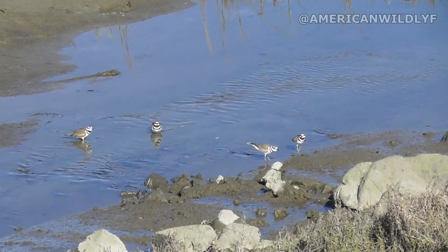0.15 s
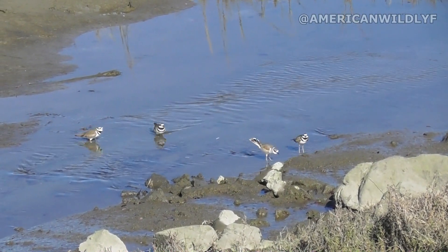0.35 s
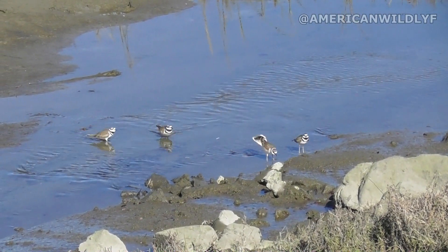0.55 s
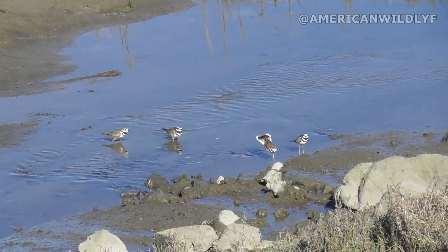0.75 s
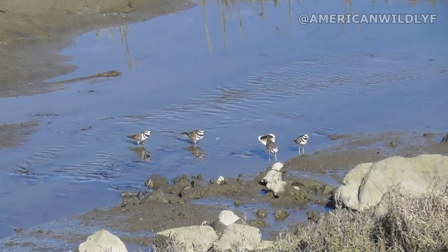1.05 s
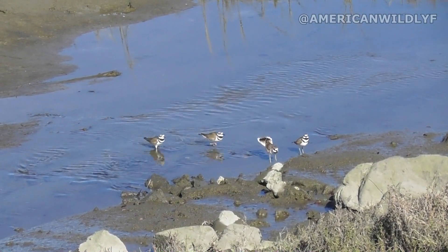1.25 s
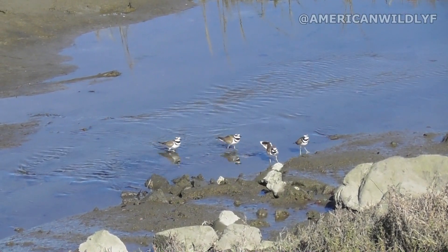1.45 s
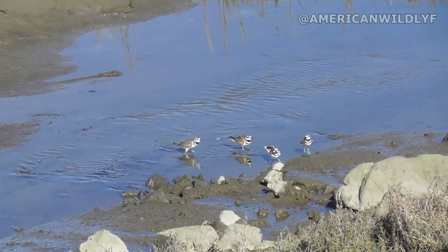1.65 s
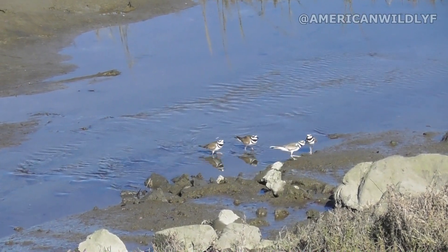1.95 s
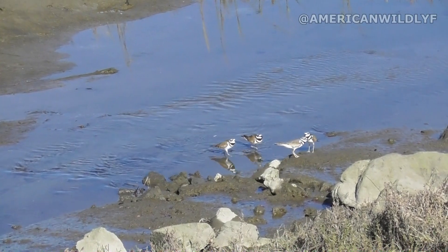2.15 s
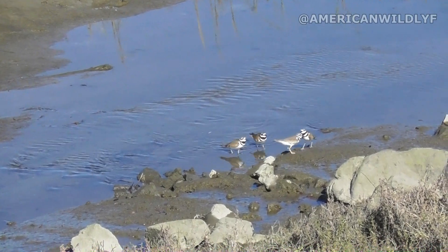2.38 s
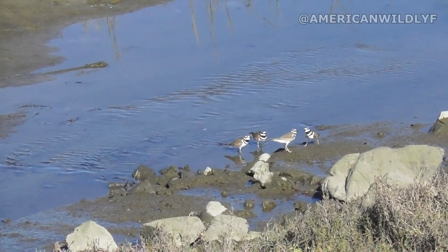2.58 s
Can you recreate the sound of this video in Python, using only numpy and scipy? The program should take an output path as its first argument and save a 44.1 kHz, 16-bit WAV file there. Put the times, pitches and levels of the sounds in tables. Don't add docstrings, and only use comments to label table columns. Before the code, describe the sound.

Small shorebirds pipe rapid, high, thin whistles and sharp kips over gusty wind and low rumble

```python
import sys
import numpy as np
from scipy import signal
from scipy.fft import rfft, irfft, next_fast_len
from scipy.io import wavfile
from scipy.ndimage import uniform_filter1d

SR = 44100
rng = np.random.default_rng(int(sys.argv[2]) if len(sys.argv) > 2 else 0)


def ratio_of_db(decibels):
    return 10 ** (np.asarray(decibels, float) / 20)


def to_wav(s):
    ch = np.atleast_2d(s).T
    pcm = np.round(np.clip(ch, -1, 1) * 32767)
    wavfile.write(sys.argv[1], SR, pcm.astype(np.int16))


N = 119952
BREEZE_DB = -51


def rms_one(x):
    return x / np.sqrt(np.mean(x ** 2) + 1e-20)


def filtered(x, order, hz, kind):
    return signal.sosfilt(signal.butter(order, hz, kind, fs=SR, output="sos"), x)


def drift(rate_hz):
    r = np.exp(-80 * np.pi * rate_hz / SR)
    slow = signal.lfilter([1], [1, -2 * r, r * r], rng.standard_normal(N // 40 + 2002))[2000:]
    return np.interp(np.arange(N) / 40, np.arange(len(slow)), rms_one(slow))


def swell(db):
    return ratio_of_db(db * np.linspace(-1, 1, N))


def sing(rows, voice):
    climb_hz, climb_bend, drop_hz, drop_bend, attack, release, partials_db = voice
    overtone_follows, mean_call_db = 0.45, -30
    out = np.zeros(N)
    wobble = 0.003 * drift(70)
    waver_db = [(1.2 if k <= 1 else 3.5) * drift(67) for k in range(7)]
    chance = rng.standard_normal((len(rows), 14))
    for (top_s, rise, fall, hz, db), c in zip(rows, chance):
        i = np.arange(max(int((top_s - rise) * SR), 0), min(int((top_s + fall) * SR), N))
        t = i / SR - top_s
        climb = climb_hz * abs(t / rise) ** climb_bend
        drop = drop_hz * abs(t / fall) ** drop_bend
        pitch = hz - np.where(t < 0, climb, drop)
        phase = np.pi * np.cumsum(pitch * (1 + wobble[i])) / SR
        edge = np.minimum((t + rise) / attack, (fall - t) / release)
        env = np.sin(np.pi / 2 * np.clip(edge, 0, 1))
        arch = np.sin(np.pi * np.clip((t + rise) / (rise + fall), 0, 1) ** 0.75)
        for k, partial_db in enumerate(partials_db):
            level_db = db + partial_db + waver_db[k][i]
            if k != 1:
                level_db = level_db - (1 - overtone_follows) * (db - mean_call_db)
            if k > 1:
                level_db = level_db + 2 * c[k]
            shape = env ** (1 + 0.11 * abs(k - 1)) * arch ** (0.18 * max(k - 1, 0))
            out[i] += ratio_of_db(level_db) * shape * np.sin((k + 1) * phase + 3 * c[7 + k])
    return out


def whistles():
    # top in seconds, rise in s, fall in s, top in Hz, level in dB.
    arched = [(1.088, .017, .04, 3995, -30), (1.53, .02, .027, 3836, -29.5), (.848, .012, .035, 4000, -40),
              (.170, 0.019, 0.039, 3980, -38.5), (.284, .008, 0.062, 4216, -35.5),
              (.312, 0.023, 0.037, 3970, -32), (.486, 0.019, 0.039, 3953, -32),
              (.658, 0.022, 0.027, 4023, -34.5), (2.039, 0.016, 0.036, 3984, -26.5),
              (2.191, 0.018, 0.036, 4003, -26), (2.341, .019, 0.0368, 4040, -28.5),
              (2.675, .017, .028, 3770, -30), (1.895, 0.015, 0.033, 3780, -32),
              (.03, 0.027, 0.031, 3920, -35.5)]
    full = [
        (0.5405, 0.017, 0.052, 4145, -29),
        (1.112, 0.026, 0.037, 4064, -34),
    ]
    thin = [
        (1.690, 0.024, .046, 3960, -34),
        (2.395, .03, 0.04, 3900, -35),
        (1.905, 0.013, .055, 3940, -37),
        (2.150, 0.025, 0.0365, 3793, -35.5),
    ]
    dull = [
        (.822, 0.015, 0.054, 4170, -32),
        (1.372, .01, 0.037, 3843, -36.5),
        (1.023, .012, .022, 4000, -30),
        (1.714, .012, 0.0244, 3800, -36),
        (2.493, .015, .041, 3907, -30.5),
    ]
    bright = [
        (1.385, 0.009, .064, 4235, -37),
    ]
    # climb in Hz, its bend, drop in Hz, its bend, attack in s, release in s, partials 1-7 in dB.
    arched_voice = (251, 2.12, 399, 1.57, 0.013, 0.015, [-26, 0, -28, -19.5, -28, -43, -45])
    full_voice = (475, 4.45, 580, 2.56, 0.0099, 0.022, [-8.5, 3.5, -24.5, -24.5, -35, -34, -40])
    thin_voice = (237, 4.66, 408, 1.73, 0.0043, 0.019, [-17, 0.5, -20.5, -14.5, -21, -24, -47])
    dull_voice = (330, 3.87, 420, 1.79, 0.0052, .02, [-28, 1, -40, -23.5, -46, -44, -52])
    bright_voice = (200, 3, 560, 1.5, .005, .022, [-18, 0, -14, -15, -32, -40, -17])
    out = sing(arched, arched_voice) + sing(full, full_voice) + sing(thin, thin_voice)
    return out + sing(dull, dull_voice) + sing(bright, bright_voice)


def kips():
    # top in seconds, rise in s, fall in s, top in Hz, level in dB.
    calls = [
        (.02, .05, .022, 3850, -38),
        (.757, 0.0097, 0.019, 3770, -35.5),
        (.904, 0.012, 0.02, 3863, -27),
        (1.167, 0.01, 0.023, 3876, -31),
        (1.347, 0.0094, 0.0303, 3910, -40),
        (1.407, 0.0054, 0.02, 3910, -28),
    ]
    # climb in Hz, its bend, drop in Hz, its bend, attack in s, release in s, partials 1-7 in dB.
    voice = (620, 2.16, 480, 1.23, 0.018, 0.033, [-18, 3.5, -32, -19, -21, -24.5, -44])
    return sing(calls, voice)


def trill():
    # top in seconds, top in Hz, level in dB.
    beats = [(1.463, 3510, -44), (1.494, 3540, -42.5), (1.561, 3450, -39), (1.591, 3520, -42),
             (1.627, 3500, -49), (1.657, 3600, -45), (1.698, 3830, -37), (1.727, 3760, -35),
             (1.756, 3780, -38.5), (1.795, 3800, -43), (1.825, 3770, -44), (1.855, 3800, -41.5),
             (1.928, 3950, -33.5), (1.962, 3870, -33.5), (1.993, 3860, -33), (2.091, 3790, -45),
             (2.158, 3784, -47), (2.621, 3780, -41.5), (1.557, 3800, -51)]
    # climb in Hz, its bend, drop in Hz, its bend, attack in s, release in s, partials 1-7 in dB.
    voice = (60, 1.5, 180, 1.3, .004, .010, [-36, 0, -26, -30, -24, -42, -50])
    rise_s, fall_s = 0.006, 0.014
    return sing([(s, rise_s, fall_s, hz, db) for s, hz, db in beats], voice)


def pips():
    # dip in seconds, before in s, after in s, dip in Hz, level in dB.
    calls = [(.068, .016, .016, 3440, -43), (.24, .017, .022, 3440, -45), (.745, 0.0047, .01, 3470, -37),
             (.435, .021, .024, 3400, -43), (.625, .024, .022, 3400, -41), (.778, .01, .012, 3390, -40),
             (.932, .008, .01, 3390, -46), (1.055, .011, .011, 3400, -42), (1.228, .012, .012, 3390, -49.5),
             (1.268, .013, .016, 3420, -44), (1.497, .01, .028, 4140, -49), (1.15, .018, .02, 5000, -61),
             (.62, .025, .03, 4100, -52)]
    # climb in Hz, its bend, drop in Hz, its bend, attack in s, release in s, partials 1-7 in dB.
    voice = (-110, 1.5, -40, 2.5, .006, .014, [-40, 0, -40, -40, -30, -46, -52])
    return sing(calls, voice)


def puffs():
    # peak in seconds, length in s, level in dB.
    bursts = [
        (.522, .003, -54),
        (.745, .003, -55),
        (.81, 0.0018, -63),
        (1.015, .003, -59),
        (1.082, .002, -53),
        (1.346, .003, -56),
        (1.413, .008, -58),
        (2.626, .006, -54),
    ]
    t = np.arange(N) / SR
    noise = filtered(rng.standard_normal(N), 4, [3300, 11500], "band")
    return rms_one(noise) * sum(ratio_of_db(db) * np.exp(-((t - s) / length) ** 2) for s, length, db in bursts)


def seeps():
    # top in seconds, rise in s, fall in s, top in Hz, level in dB.
    calls = [
        (.062, 0.0036, 0.025, 6000, -57),
    ]
    # climb in Hz, its bend, drop in Hz, its bend, attack in s, release in s, partials 1-7 in dB.
    voice = (50, 1.5, 900, 1.2, .004, .01, [-60, 0, -60, -60, -60, -60, -60])
    return sing(calls, voice)


def far_flock():
    rows = []
    for when, length, tune, loud in rng.random((70, 4)):
        hz = 3780 + 213 * (2 * tune - 1)
        db = -63 + 22 * (2 * when - 1) + 8 * (loud - 0.5)
        rows.append((when * N / SR, 0.012, 0.0213 + 0.0326 * length, hz, db))
    return sing(rows, (150, 1.8, 250, 1.6, 0.008, 0.015, [-42, -5.0, -31, -25, -40, -49, -56]))


def birds():
    calls = whistles() + kips() + trill() + pips() + puffs() + seeps() + far_flock()
    scatter_db, scatter_t60_s = -13, 0.22
    t = np.arange(SR // 2) / SR
    tail = rng.standard_normal(len(t)) * ratio_of_db(-60 * t / scatter_t60_s) * np.clip(t / 0.0053, 0, 1)
    tail *= ratio_of_db(scatter_db) / np.sqrt(np.sum(tail ** 2))
    tail[0] = 1
    return signal.fftconvolve(calls, tail)[:N]


def banded(spectrum, patchy_db, swing_db=0, brighten=0, count=1):
    hz_pts, db_pts = np.transpose(spectrum)
    white = rng.standard_normal((2, count, N))
    shared = drift(27.4)
    out = 0
    edges = np.geomspace(hz_pts[0], hz_pts[-1], int(2.5 * np.log2(hz_pts[-1] / hz_pts[0])) + 1)
    for k, (low, high) in enumerate(zip(edges, edges[1:])):
        hz = np.sqrt(low * high)
        band = filtered(white[k % 2], 2, [low, high], "band")
        db = np.interp(np.log(hz), np.log(hz_pts), db_pts) + swing_db * brighten * np.log10(hz / 500)
        flicker_db = patchy_db * (0.77 * shared + 1.13 * drift(22.4))
        out = out + band * ratio_of_db(db + flicker_db)
    return rms_one(out)


def matrixed(x, direct, late):
    lag_s, turn_rad = 0.002576, 1.177
    size = next_fast_len(N + 999)
    hz = np.arange(size // 2 + 1) * SR / size
    comb = direct * np.exp(1j * turn_rad) - late * np.exp(-2j * np.pi * hz * lag_s)
    return irfft(rfft(x, size) * comb, size)[:N]


def gusts_db():
    # peak in seconds, rise in s, fall in s, level in dB.
    gusts = [(.03, 0.34, 0.14, -34), (0.25, 0.12, 0.14, -27), (.75, 0.38, 0.45, -44.5),
             (.94, 0.036, 0.027, -37), (1.09, 0.04, 0.016, -45), (1.217, 0.062, 0.2, -30.5),
             (1.348, 0.054, 0.061, -33), (1.447, 0.12, 0.07, -32), (1.8, 0.15, 0.11, -34),
             (2.1, 0.097, 0.036, -47.5), (2.3, 0.081, 0.039, -44)]
    edge_db = 11
    t = np.arange(N) / SR
    power = ratio_of_db(2 * BREEZE_DB)
    for s, rise, fall, db in gusts:
        bell = ((t - s) / np.where(t < s, rise, fall)) ** 2
        power = power + ratio_of_db(2 * db - 2 * edge_db * bell)
    return 10 * np.log10(power)


def wind(gust_db):
    # frequency in Hz, density in dB per Hz.
    spectrum = [(40, -52), (135, -11), (206, 0), (300, 1.5), (500, -0.5), (1190, -13.5), (1850, -21.5),
                (3600, -49)]
    noise = ratio_of_db(gust_db) * banded(spectrum, 2, gust_db - gust_db.mean(), brighten=0.69, count=3)
    push, own, both = filtered(noise, 6, 2900, "low")
    buffet = filtered(both + push, 2, [133, 267], "band")
    leak = matrixed(push + ratio_of_db(-3) * own, ratio_of_db(-4), ratio_of_db(-5))
    return leak + ratio_of_db(-2) * buffet, push


def rumble():
    # frequency in Hz, density in dB per Hz.
    spectrum = [(40, -43), (80, -10.5), (160, 2), (250, 0), (500, -6.5), (1000, -14.5), (2000, -17.5),
                (3000, -44)]
    return ratio_of_db(-40) * banded(spectrum, 2.87, count=2)


def water():
    ripple = filtered(rng.standard_normal(N), 2, [1500, 2400], "band")
    fizz = filtered(rng.standard_normal(N), 2, [7400, 7950], "band")
    return ratio_of_db(-62) * swell(13.5) * (rms_one(ripple) + ratio_of_db(-7) * rms_one(fizz))


def hiss(gust_db):
    # frequency in Hz, density in dB per Hz.
    spectrum = [(2800, -11), (3260, -12.5), (3810, 0), (4600, -21.5), (6860, -18.5), (7750, -19.5),
                (9500, -24), (16500, -44)]
    duck_share = 0.22
    duck = ratio_of_db(-duck_share * uniform_filter1d(gust_db - BREEZE_DB, size=3000))
    centre, wide = duck * ratio_of_db(-60) * swell(5) * banded(spectrum, 1.1, count=2)
    return centre, ratio_of_db(-15.5 + 4.9 * drift(1.5)) * filtered(wide, 4, 8000, "high")


def scene():
    gust_db = gusts_db()
    wind_mid, wind_side = wind(gust_db)
    rumble_mid, rumble_side = rumble()
    hiss_mid, hiss_side = hiss(gust_db)
    mid = birds() + wind_mid + matrixed(rumble_mid + water(), 0.75, 0.44) + hiss_mid
    side = wind_side + ratio_of_db(-21) * rumble_side + hiss_side
    return np.array([mid + side, mid - side])


def roll_off(x):
    return signal.sosfilt(signal.butter(12, 15690, fs=SR, output="sos"), x)


def record(dry):
    mix = dry + ratio_of_db(-72) * filtered(rng.standard_normal(N), 2, 9000, "high")
    mix = filtered(mix, 2, 38, "high")
    mix = signal.sosfilt(signal.cheby2(10, 50, 16250, fs=SR, output="sos"), mix)
    return roll_off(mix)


dry = scene()
out = record(dry)
to_wav(out)
```